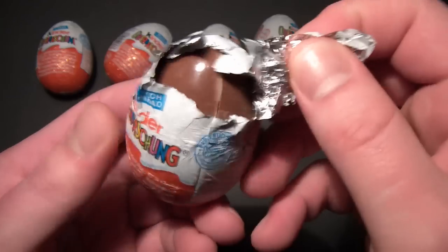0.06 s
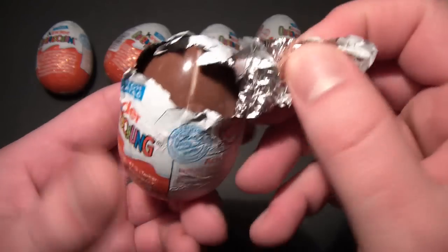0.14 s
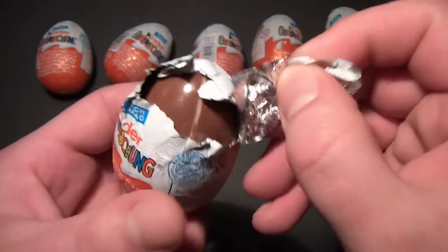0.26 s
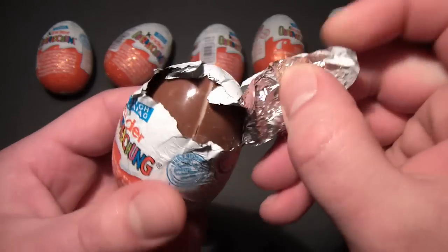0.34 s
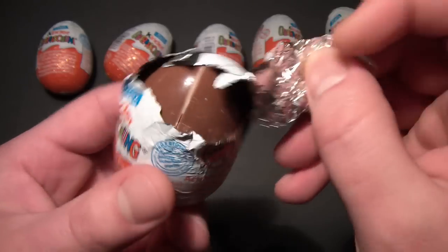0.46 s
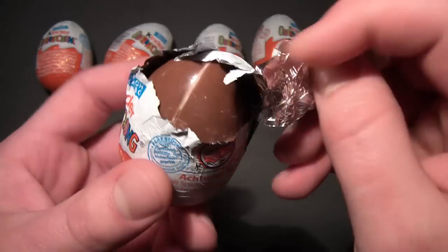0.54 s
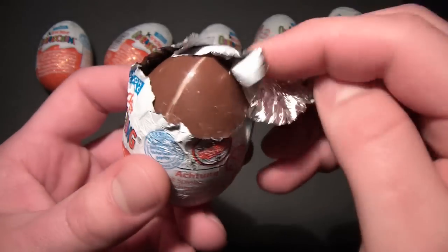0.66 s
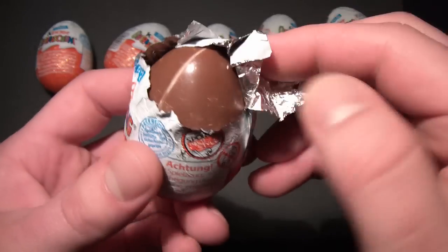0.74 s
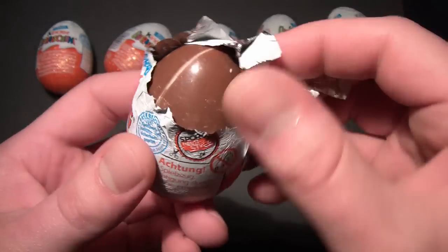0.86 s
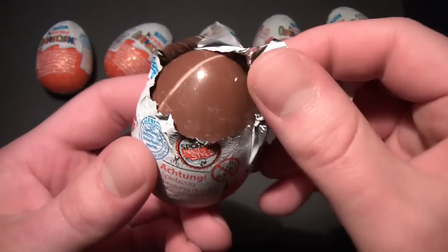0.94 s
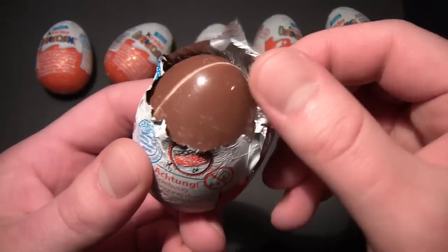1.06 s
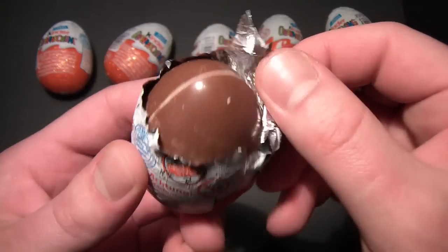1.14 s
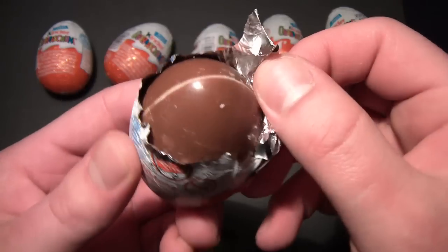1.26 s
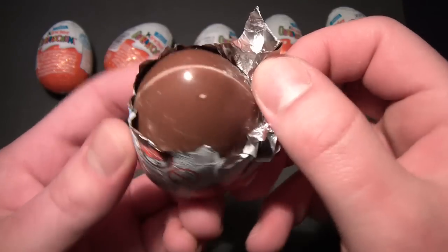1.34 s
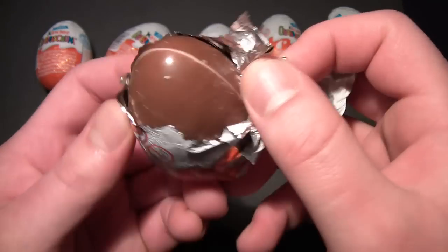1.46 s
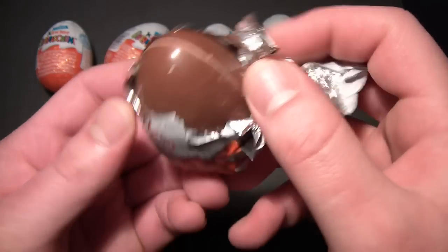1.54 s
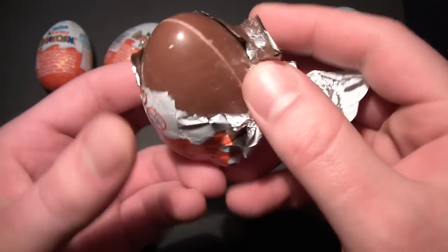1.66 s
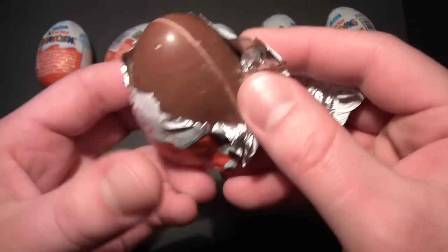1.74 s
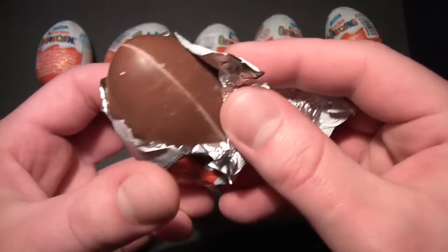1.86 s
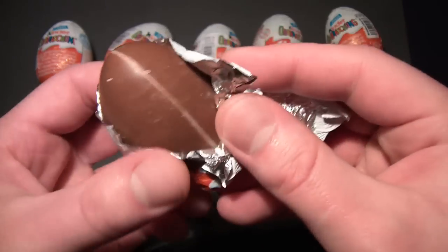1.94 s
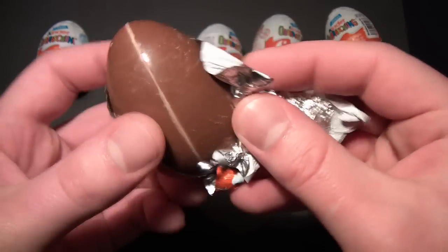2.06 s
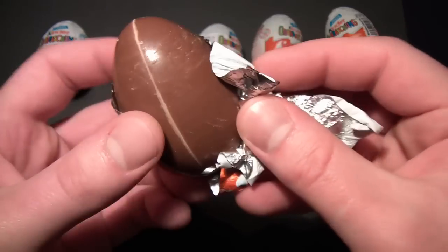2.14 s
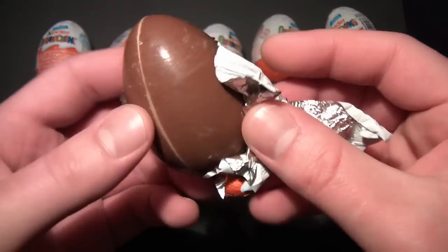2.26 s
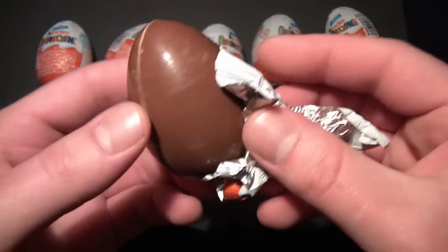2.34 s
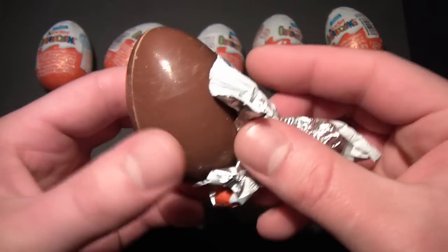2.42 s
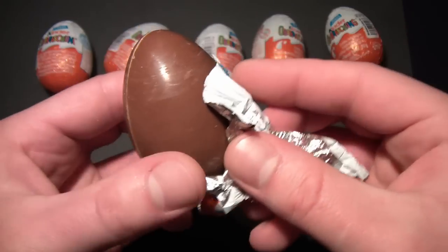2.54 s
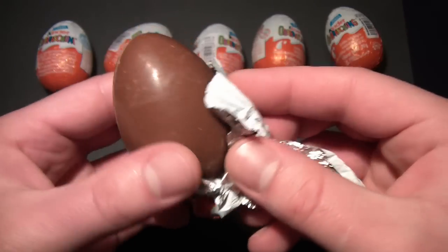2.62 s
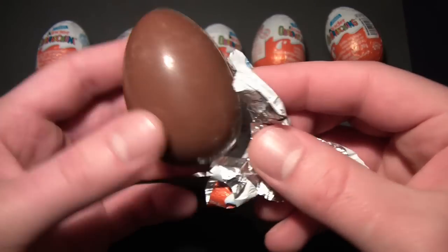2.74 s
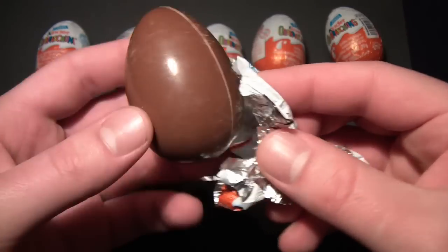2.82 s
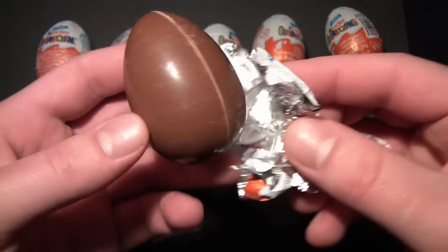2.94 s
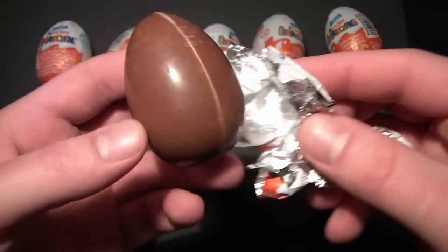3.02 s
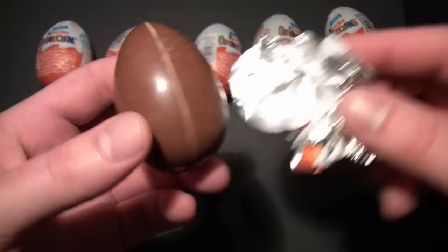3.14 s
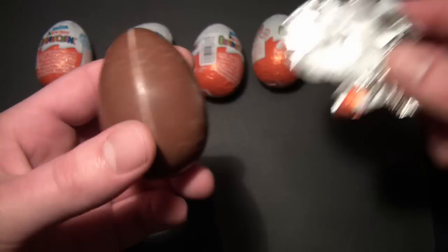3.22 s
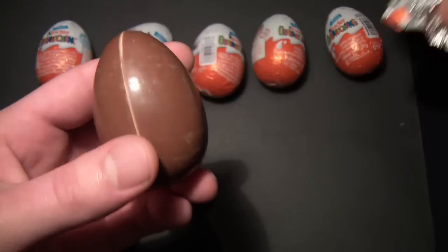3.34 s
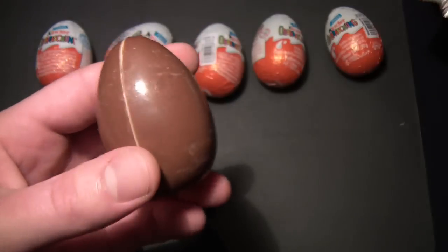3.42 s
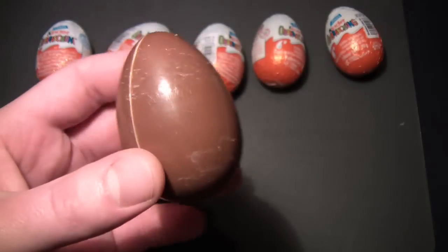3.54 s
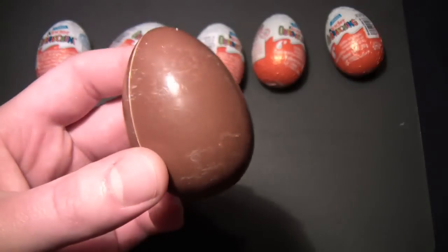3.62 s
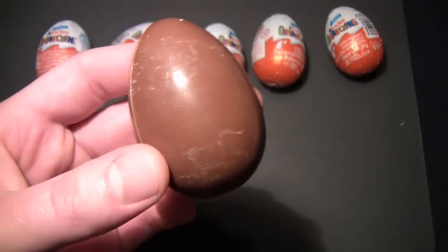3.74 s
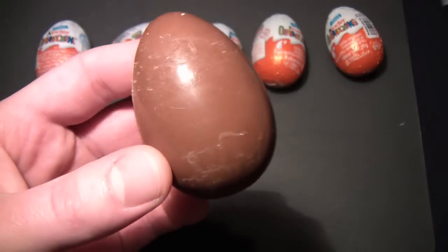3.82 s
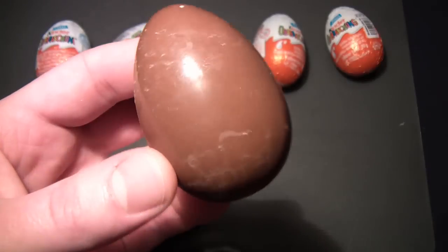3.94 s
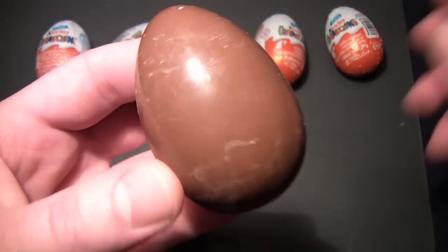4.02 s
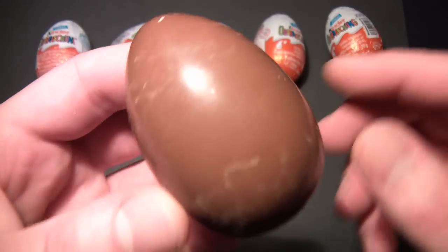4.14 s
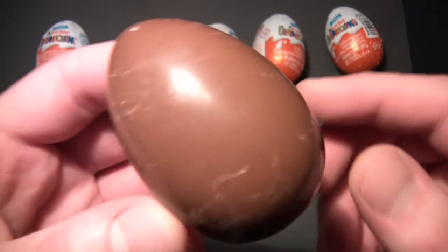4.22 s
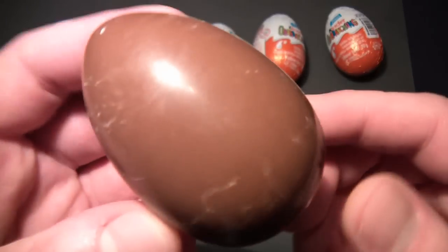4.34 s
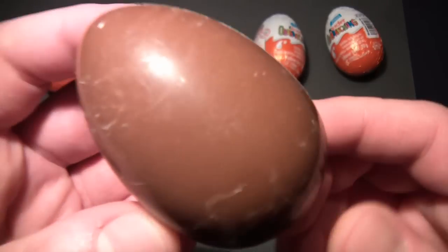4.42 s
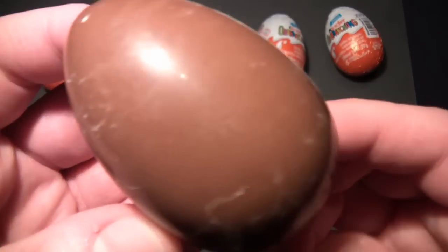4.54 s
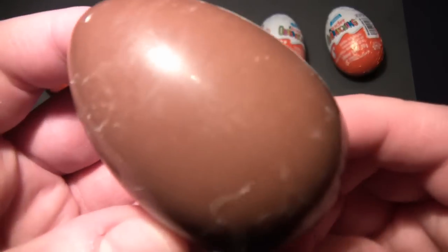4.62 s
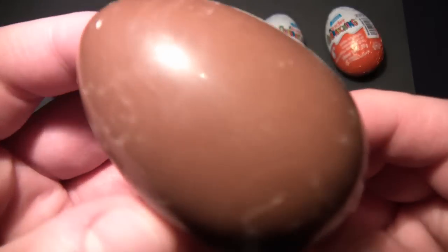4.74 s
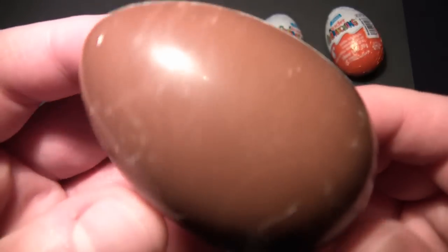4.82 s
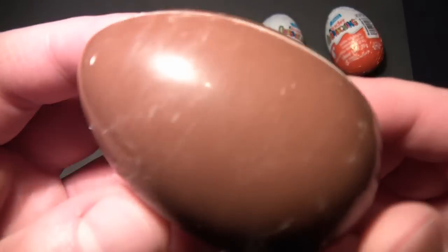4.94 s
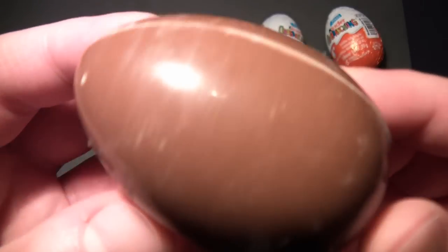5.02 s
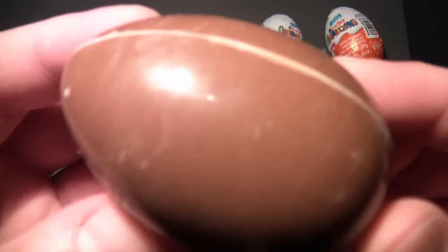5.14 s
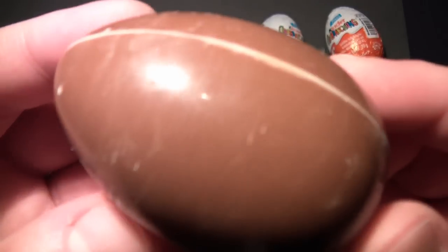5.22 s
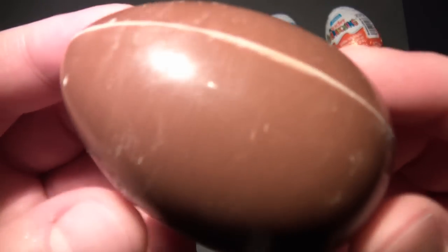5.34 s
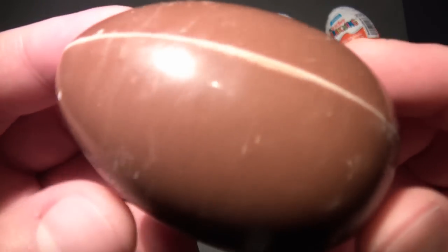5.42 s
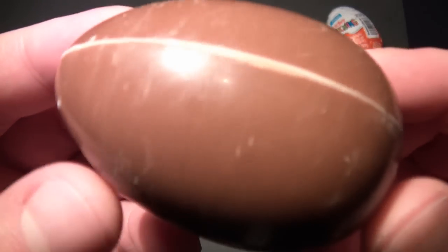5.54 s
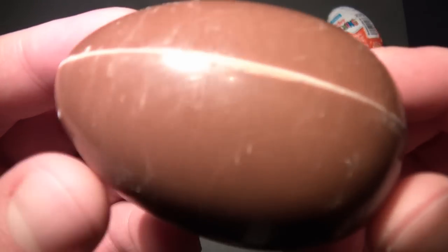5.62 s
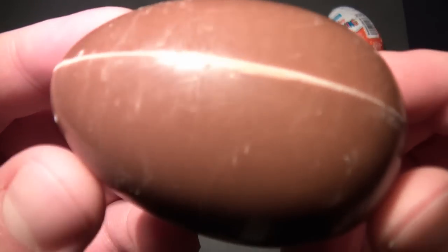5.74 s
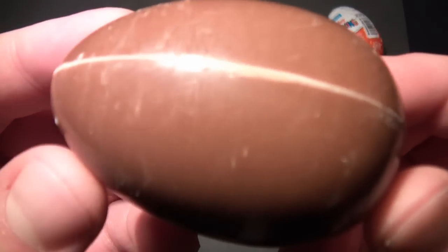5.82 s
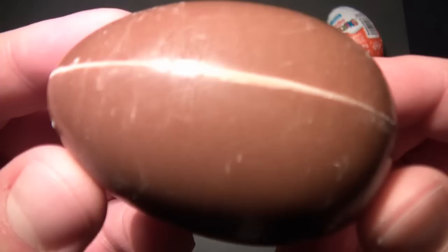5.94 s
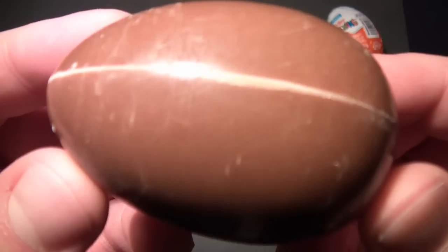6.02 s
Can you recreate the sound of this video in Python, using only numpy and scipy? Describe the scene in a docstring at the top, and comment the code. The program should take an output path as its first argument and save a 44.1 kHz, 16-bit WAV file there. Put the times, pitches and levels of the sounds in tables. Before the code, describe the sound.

Bright, crisp foil crinkles in short drags and sharp snaps for three seconds, ends in a loud crack, then small scraps of rustle fade into quiet room hiss.

```python
"""Thin metal foil is peeled off a hollow chocolate egg up close: creases buckle with sharp snaps, made of force
bursts ringing foil panels, over a rustle of tiny decaying sines and rubbing hiss that swells with each drag.
The crumpled foil is put down and pushed away. Soft noise puffs are fingertips bumping the egg, a decaying low
sine is the egg slipping free, and faint sine pings are something loose inside it.
Behind lie a short room tail, preamplifier hiss, room rumble and a few wavering tones."""
import sys
import numpy as np
from scipy import signal
from scipy.fft import rfft, irfft, next_fast_len
from scipy.io import wavfile
from scipy.ndimage import map_coordinates

SR = 44100
rng = np.random.default_rng(int(sys.argv[2]) if len(sys.argv) > 2 else 0)


def master_out(mix):
    """Clip the mix to full scale and print it as 16-bit PCM to the path in sys.argv[1]."""
    frames = np.transpose(np.atleast_2d(mix))
    ceiling = np.clip(frames, -1, 1)
    pcm = np.round(ceiling * 32767).astype(np.int16)
    wavfile.write(sys.argv[1], SR, pcm)


N = 267680

# Buckling creases. Each row: time in seconds, level in dB, panel pitch in Hz, treble share in dB.
CREASE_SNAPS = [(0.0417, -18.5, 3220, 11.5), (.063, -15.5, 8500, 4), (0.128, -22.5, 5680, 14),
                (0.1689, -7, 5700, 11.5), (0.2534, -17, 3000, 0), (0.259, -20.5, 2600, 1),
                (.338, -19.5, 2970, -10), (0.3494, 0.5, 8900, 16.5), (0.3605, -26, 5420, 8),
                (0.381, -27, 5770, 3), (0.4055, -13, 3427, 9), (0.441, -19, 6400, -5),
                (0.4973, -22.5, 5990, 2.5), (0.5109, -21, 5050, 7.5), (0.5355, -9, 8590, 23),
                (0.5527, -14, 5210, 27), (.574, -11, 3560, 16), (0.5828, -11.5, 5740, 7),
                (0.589, -10, 3430, -2), (0.6098, -15.5, 5600, 8.5), (0.638, -15.5, 4900, 14.5),
                (.7508, -4, 5170, 6), (0.766, -13, 8520, 10), (0.7832, -7.5, 5240, 37),
                (.818, -12.5, 6940, 16), (0.8725, -15.5, 6124, 5.5), (0.899, -9.5, 7350, 18),
                (0.9408, -21.5, 5300, 13), (0.9516, -5.5, 5220, 10), (0.9979, -5, 6500, 11),
                (1.0276, -15.5, 2800, 3), (1.099, -15, 5260, -3), (1.131, -9, 4200, -27),
                (1.1461, -3, 3573, -17.5), (1.1472, -7, 3740, -14), (1.163, -22.5, 5340, 3.5),
                (1.2022, -10, 3882, 3), (1.22, 0, 3240, -25), (1.2719, -12.5, 3260, -11.5),
                (1.286, -3.5, 3580, 4), (1.322, -14.5, 3370, 0), (1.347, -19, 3260, -4),
                (1.3839, -18, 3260, 5), (1.4318, -9.5, 6500, -21), (1.465, -12, 5060, 7),
                (1.4949, -11.5, 1840, 1), (1.54, -15, 2400, 4), (1.5486, -17.5, 4070, 5),
                (1.627, -16, 3920, 7), (1.6634, -8, 3380, -12), (1.722, -17.5, 8790, 9.5),
                (1.796, -21, 8170, 4.5), (1.8113, -13.5, 5455, 12), (1.8522, -9, 2380, 0),
                (1.8843, -13, 3200, -3), (1.8905, -12, 1330, -9.5), (1.9897, -6, 2110, -2.5),
                (2.0714, -14, 6334, 2), (2.1255, 0.5, 2480, 2), (2.1678, -2.5, 4220, 12.5),
                (2.1866, -4.5, 8100, 28), (2.199, -0.5, 5600, 2.5), (2.202, -5.5, 2577, 2.5),
                (2.2056, -8.5, 2515, -7), (2.2149, -9.5, 5240, -5.5), (2.292, -19, 6200, 10.5),
                (2.3066, -11, 5770, 11), (2.3131, -16.5, 4120, -7), (2.3212, -14, 3960, -3.5),
                (2.338, -17, 3450, -6), (2.3732, -7, 5770, -4), (2.3753, -1.5, 4200, 10),
                (2.3994, -18.5, 4100, -16), (2.466, -2, 4160, -6), (2.476, -12.5, 3380, 13.5),
                (2.5017, -18.5, 6030, 10.5), (2.5373, -16.5, 4100, 3), (2.5876, -14.5, 5095, 1),
                (2.6007, -17, 5850, 6), (2.654, -19, 4600, 2.5), (2.7344, -15.5, 5495, 3.5),
                (2.8348, -10, 5870, 6.5), (2.8551, -9, 6460, 5), (2.8836, -20, 3663, 1.5),
                (2.895, -12.5, 1156, -14.5), (2.9193, -21.5, 3000, -20), (2.989, -19.5, 3510, -9),
                (3.0107, -18, 2940, -11), (3.088, -11, 1526, -1.5), (3.1, 5, 3063, -9),
                (3.44, -14.5, 5940, -6), (3.5577, -23.5, 5300, -5), (3.7028, -32, 2940, 5.5),
                (4.0335, -10, 4730, -24), (4.09, -29.5, 8000, 6.5), (4.104, -19, 2900, -7),
                (4.205, -26.5, 3400, -7.5), (4.6319, -21, 4470, -18.5), (4.6385, -25.5, 2540, -13),
                (4.692, -19, 8260, 4.5), (4.75, -30, 4160, -10.5)]
# Drags of a finger or a fold across the foil. Each row: start and end in seconds, level in dB, panel pitch in Hz.
FOIL_DRAGS = [(0.237, 0.278, -41.5, 2800), (0.369, 0.381, -36, 5340), (0.408, 0.468, -35, 4640),
              (0.497, 0.562, -29.5, 5600), (0.574, 0.607, -33, 3200), (0.598, 0.639, -40, 5660),
              (0.758, 0.821, -38.5, 5580), (0.831, 0.851, -34.5, 5820), (.939, 0.963, -33, 5220),
              (0.987, 1.027, -39, 3190), (1.055, 1.075, -36.5, 2220), (1.117, 1.137, -31.5, 4130),
              (1.154, 1.154, -31.5, 3570), (1.19, 1.257, -29.5, 4300), (1.266, 1.308, -28.5, 2900),
              (1.437, 1.477, -31.5, 3290), (1.48, 1.51, -31, 1900), (1.656, 1.662, -22.5, 3640),
              (1.8, 1.828, -35, 5540), (1.835, 1.863, -28, 4400), (1.883, 1.904, -35.5, 5020),
              (1.989, 2.01, -41, 3500), (2.055, 2.084, -40, 3540), (2.112, 2.131, -36, 3760),
              (2.123, 2.194, -21.5, 3112), (2.206, 2.214, -28.5, 3540), (2.279, 2.363, -41.5, 3240),
              (2.357, 2.431, -40, 2440), (2.45, 2.509, -36.5, 3100), (2.705, 2.789, -38, 3570),
              (2.804, 2.89, -33, 3233), (2.91, 2.932, -31.5, 3490), (2.939, 2.948, -31, 3300),
              (2.96, 2.963, -25.5, 2483), (3.002, 3.01, -29, 2870), (3.031, 3.098, -39.5, 2560),
              (3.108, 3.118, -26, 2700), (3.14, 3.17, -53, 3083), (3.273, 3.297, -53, 2290),
              (3.369, 3.47, -41, 2040), (3.512, 3.575, -53.5, 2140), (3.662, 3.67, -37, 6690),
              (3.775, 3.83, -46.5, 3350), (3.84, 3.858, -42, 3600), (4.034, 4.041, -31.5, 3534),
              (4.099, 4.109, -34.5, 1490), (4.209, 4.238, -46, 1157), (4.598, 4.634, -50.5, 1133),
              (4.649, 4.66, -39, 2690), (4.704, 4.711, -36, 5430)]
# Murmur of the held foil between movements. Each row: time in seconds, level in dB.
HELD_MURMUR = [(0, -37), (.04, -48.5), (.3, -56), (.4, -47.5), (.66, -47.5), (1.5, -41.5), (1.6, -47),
               (2.68, -46.5), (3.119, -40.5), (3.24, -63.5), (3.5, -59), (3.6, -57.5), (3.72, -49.5),
               (3.9, -62), (4.15, -60.5), (4.4, -74), (4.6, -73.5), (4.645, -47.5), (4.861, -73.5)]
# Bass share of the foil, higher while it drags on the hollow egg or the table. Each row: time in seconds, share in dB.
BASS_SHARE = [(0, 1.5), (.38, -12), (.55, 5), (.75, 0.5), (.95, -1), (1.05, 4.5), (1.13, 7), (1.44, -28.5),
              (1.5, -9), (1.66, -17.5), (1.9, 6), (2.35, -4.5), (2.47, 3.5), (2.85, 5), (2.94, -1.5),
              (3.1, 3.5), (4.04, -4), (4.2, 6.5), (4.7, -1)]
# Spectrum of the foil's crackle. Each row: frequency in Hz, relative density in dB per Hz.
FOIL_SPECTRUM = [(88, -43), (450, -19.5), (600, -17), (1760, -16), (3350, -11.5), (3920, -13),
                 (11500, -19.5), (14800, -22)]
# The hollow egg and the foil taut over it ring along. Each row: centre in Hz, width in Hz, strength in dB.
SHELL_MODES = [(632.3, 56, -1.5), (1093, 98, -9.5), (5310, 130, 0)]
# Hollows of the open foil cup. Each row: centre in Hz, width in Hz, strength in dB.
CUP_MODES = [(1522, 300, 3), (2540, 450, 8), (3350, 750, 7)]
# Hollows of the crumpled foil. Each row: centre in Hz, width in Hz, strength in dB.
BALL_MODES = [(1530, 52, 6), (2317, 240, -1)]
# Stereo width of the foil. Each row: frequency in Hz, gain on its side signal in dB.
FOIL_WIDTH = [(60, -8), (180, -17), (550, -21), (1200, -25), (2200, -21), (4500, -15), (8000, -11),
              (15000, -10)]
# Fingertips bump the egg. Each row: time in seconds, peak in dB.
EGG_KNOCKS = [(1.023, -32), (1.474, -39.5), (1.71, -40), (1.897, -32.5), (2.207, -32), (3.102, -29)]
# A loose part taps the shell. Each row: time in seconds, level in dB before the soft onset, pitch in Hz.
SHELL_PINGS = [(5.052, -50.5, 1148), (5.794, -51.5, 1136)]
# Decay of the room. Each row: frequency in Hz, t60 in seconds.
ROOM_DECAY = [(300, 0.68), (2000, 0.29), (10000, 0.16)]
# Spectrum of room and preamplifier. Each row: frequency in Hz, relative density in dB per Hz.
FLOOR_SPECTRUM = [(20, -12), (70, -10.5), (110, -8), (160, -10), (200, -6), (300, -14), (800, -17),
                  (1600, -19), (2000, -22), (13500, -22), (14200, -45)]
# Likeness of the floor at the two ports. Each row: frequency in Hz, left-right correlation.
FLOOR_LIKENESS = [(60, 1), (200, 0.85), (700, 0.24), (15000, .05)]
# Steady background tones. Each row: pitch in Hz, rms level in dB before wavering.
HUM_TONES = [(199.5, -79), (9001, -85), (12209, -86)]

LOOSE_S = 2.905  # the last fold lets go and the foil hangs as an open cup
AWAY_S = 3.15  # the foil leaves the egg and is carried away
ASIDE_S = 3.92  # the foil now lies to the right
# snaps are thinner than drags, and differ
SNAP_BASS_DB, BASS_SCATTER_DB = -3, 1.5
# in drags, small tight panels ring high, hiss brightly and lose bass
DRAG_TREBLE_DB, TREBLE_DB_PER_OCTAVE, THIN_DB_PER_OCTAVE, MIDDLE_HZ = 0.5, 8.5, 3.5, 3300
# a drag swells in the slower the longer it lasts, loose foil slower still
RISE_S, RISE_SHARE, LOOSE_RISE_SHARE = 0.001134, 0.097, 0.15
LEFT_LAG_S = 0.000014  # the foil lying aside reaches the left port this late
GLANCE_S = 0.00086  # scale of the random delay of echoes off the hands
TOP_HZ = 16300  # band limit


def snaps(rise=0.00041, burst_t60=0.0079, flip_db=14.0, size=1024):
    """A crease creeps, then flips: a short burst of force rings the panel beside it."""
    s, level_db, pitch, treble_db = np.transpose(CREASE_SNAPS)[..., None]
    t, hz = (np.arange(size) - 64) / SR, np.fft.rfftfreq(2 * size, 1 / SR)
    chance = rng.standard_normal((len(s), size + 5))
    loose = s > AWAY_S
    life = burst_t60 * amp(3.03 * chance[:, :1] + 7.9 * loose)  # loose foil shakes longer
    envelope = np.where(t < 0, np.exp(-np.abs(t) / rise), amp(-60 * t / life))
    force = chance[:, 5:] * envelope
    force[:, 64] = amp(flip_db) * np.sign(force[:, 64])  # the flip itself
    # thin foil radiates no deep bass, and fades at the very top
    radiation = hz ** 4 / (hz ** 4 + 500 ** 4) / (1 + (hz / 15000) ** 12)
    # two smaller panels nearby
    others = sum(panel(hz, 6000 * amp(4.006 * chance[:, k:k + 1]), 23) for k in (3, 4))
    bass_db = np.interp(s, *np.transpose(BASS_SHARE)) + SNAP_BASS_DB + BASS_SCATTER_DB * chance[:, 2:3]
    colour = voiced(hz, pitch, bass_db, treble_db, ring_db=14.5 - 3.7 * loose,
                    sharpness=10 * np.sqrt(pitch / MIDDLE_HZ))
    colour = radiation * (1 + amp(5.0) * others) * colour
    rows = irfft(rfft(force, 2 * size) * colour)[:, :size]
    rows = amp(level_db) * rows / np.abs(rows).max(axis=1, keepdims=True)
    return place(s[:, 0] + t[0], rows, chance[:, 1:2])


def rustle(fall=0.0065, size=8192):
    """The crackle swells in each drag with that drag's colour, and murmurs on while the foil is held."""
    tight = crackle(hiss_db=-5, clump_db=3, tick_db=0)
    loose = crackle(hiss_db=2, clump_db=2, tick_db=-5)  # loose foil slides more than it buckles
    bed = np.where(np.arange(N) < LOOSE_S * SR, tight, loose)
    bed = np.pad(bed, ((0, 0), (size // 4, size)))
    out = np.zeros_like(bed)
    t, hz = (np.arange(size) - size // 4) / SR, np.fft.rfftfreq(size, 1 / SR)
    for start, end, db, pitch in FOIL_DRAGS:
        octaves = np.log2(pitch / MIDDLE_HZ)
        bass_db = np.interp((start + end) / 2, *np.transpose(BASS_SHARE)) - THIN_DB_PER_OCTAVE * octaves
        treble_db = DRAG_TREBLE_DB + TREBLE_DB_PER_OCTAVE * octaves
        colour = voiced(hz, pitch, bass_db, treble_db, ring_db=-0.5 + 5.9 * (start > AWAY_S), sharpness=7)
        at = round(start * SR)
        piece = irfft(rfft(bed[:, at:][:, :size]) * colour, size)
        rise = RISE_S + (LOOSE_RISE_SHARE if start > AWAY_S else RISE_SHARE) * (end - start)
        # swell up to the start, hold, and die away after the end
        swell = np.exp(np.minimum(t / rise, 0) - np.maximum((t - end + start) / fall, 0))
        out[:, at:][:, :size] += amp(db) * swell * piece
    held = filtered(crackle(hiss_db=8.5, clump_db=3.0, tick_db=5.0),
                    lambda hz: voiced(hz, 3900, 1.5, 5.0, ring_db=-7.0, sharpness=0.89))
    s, held_db = np.transpose(HELD_MURMUR)
    murmur = amp(np.interp(np.arange(N) / SR, s, held_db, right=-120)) * unit(held)
    return out[:, size // 4:][:, :N] + murmur


def crackle(hiss_db, clump_db, tick_db, spread_db=1.5, top_db=16, cycles=1.2, ring_db=17, count=14000, size=160):
    """Countless tiny buckles in clumps, each a few cycles at its own pitch, over the hiss of rubbing; rms 1."""
    t = np.arange(size) / SR
    u, lean = rng.random((count, 4)), rng.standard_normal((count, 1))
    pitch = 500 * 30 ** u[:, 1:2]
    life = cycles * amp(ring_db * u[:, 3:])  # in cycles: some click, some ring
    size_db = np.minimum(-spread_db * np.log(u[:, 2:3]), top_db)
    envelope = np.exp(-t * pitch / life) / np.sqrt(life) * np.hanning(2 * size)[size:]
    grains = amp(size_db) * np.sin(2 * np.pi * pitch * t) * envelope
    bed = place(u[:, 0] * N / SR, grains, lean)
    # pitches are even per octave: lift to even per Hz
    bed = unit(filtered(bed, lambda hz: np.clip(hz, 500, 15000)))
    bed = bed + amp(hiss_db) * rng.standard_normal((2, N)) + amp(tick_db) * unit(ticks())
    bed = bed * amp(clump_db * (wobble(70) + wobble(200)))
    return unit(filtered(bed, lambda hz: amp(along(FOIL_SPECTRUM, hz))))


def ticks(count=1200, size=256):
    """Sparse small creases: bursts of about a millisecond, each coloured by its own panel."""
    u, g = rng.random((count, 3)), rng.standard_normal((count, size + 1))
    colour = 1 + amp(12) * panel(np.fft.rfftfreq(size, 1 / SR), 1500 * 8 ** u[:, 2:], 13)
    rows = irfft(rfft(g[:, 1:] * np.exp(-np.arange(size) / 25)) * colour)
    return place(u[:, 0] * N / SR, amp(6 * u[:, 1:2]) * rows, g[:, :1])


def voiced(hz, pitch, bass_db, treble_db, ring_db, sharpness):
    """Colour of one movement: bass and treble shares, and the foil panel that rings below the treble."""
    bass, middle, treble = shares(hz)
    ring = 1 + amp(ring_db) * panel(hz, pitch, sharpness)
    return (amp(bass_db) * bass + middle) * ring + amp(treble_db) * treble


def shares(hz):
    """Smooth weights of bass, middle and treble that add up to one."""
    bass = 1 / (1 + (hz / 1400) ** 6)
    treble = 1 - 1 / (1 + (hz / 7500) ** 6)
    return bass, 1 - bass - treble, treble


def panel(hz, pitch, sharpness):
    """One damped resonance of a foil panel, gain 1 at its pitch."""
    damping = 1j * hz * pitch / sharpness
    return damping / (pitch ** 2 - hz ** 2 + damping)


def hollows(x, modes, plain_db):
    """The sound x with hollow shapes ringing along as damped resonances; plain_db scales the whole."""
    def response(hz):
        ring = sum(amp(db) * 1j * hz * w / (c * c - hz * hz + 1j * hz * w) for c, w, db in modes)
        return amp(plain_db) * (1 + ring)
    return filtered(x, response)


def thump(db=-43, t60=0.059):
    """The egg slips free and a low push of air reaches the ports: a decaying 60 Hz sine."""
    t = np.clip(np.arange(N) / SR - 3.098, 0, None)
    return amp(db - 60 * t / t60) * np.sin(2 * np.pi * 60 * t)


def knocks(t60=.04, pitch_hz=380, size=4096):
    """Fingertips bump the egg: soft dull puffs of low noise."""
    s, peak_db = np.transpose(EGG_KNOCKS)[..., None]
    t, hz = np.arange(size) / SR, np.fft.rfftfreq(size, 1 / SR)
    puff = rng.standard_normal((len(s), size)) * amp(-60 * t / t60) * (1 - np.exp(-t / 0.006))
    rows = irfft(rfft(puff) * panel(hz, pitch_hz, .5) ** 2)
    rows = amp(peak_db) * rows / np.abs(rows).max(axis=1, keepdims=True)
    return place(s[:, 0], rows, 0 * s)[0]


def pings(t60=0.061):
    """A loose part taps the hollow shell, which rings on one note."""
    s, level_db, hz = np.transpose(SHELL_PINGS)[..., None]
    t = np.arange(SR // 10) / SR
    onset = 1 - np.exp(-t / 0.0018)
    rows = amp(level_db - 60 * t / t60) * np.sin(2 * np.pi * hz * t) * onset
    return place(s[:, 0], rows, 0 * s)[0]


def room(x, count=12):
    """Each frequency dies at its own speed; the hands move, so every half second has its own tail."""
    out = np.zeros((2, N + SR))
    step = -(-N // count)
    for k in range(count):
        hz, t, z = signal.stft(rng.standard_normal((2, SR // 3)), SR, nperseg=256)
        decay = amp(-60 * t / along(ROOM_DECAY, hz)[:, None])
        tail = signal.istft(z * decay, SR, nperseg=256)[1]
        tail = tail / np.linalg.norm(tail[0])
        wet = signal.fftconvolve(x[None, k * step:(k + 1) * step], tail, axes=1)
        out[:, k * step + 150:][:, :wet.shape[1]] += wet  # pre-delay of 150 samples
    return out[:, :N]


def floor(level_db=-61.5):
    """Hiss that differs between the ports, room rumble that both share, and a few wavering tones."""
    def spread(hz):
        turn = np.arccos(np.clip(along(FLOOR_LIKENESS, hz), -1, 1)) / 2
        return amp(along(FLOOR_SPECTRUM, hz)) * [np.cos(turn), np.sin(turn)]
    mid, side = filtered(rng.standard_normal((2, N)), spread)
    t = np.arange(N) / SR
    tones = sum(np.sqrt(2) * amp(db + 3 * wobble(15)) * np.sin(2 * np.pi * hz * t + wobble(12))
                for hz, db in HUM_TONES)
    return amp(level_db) * unit(np.array([mid + side, mid - side])) + tones


def place(times, rows, lean):
    """Sums rows at their times: mid, and side as an echo off the hands with each row's own sign and delay."""
    at = np.round(times * SR).astype(int)[:, None] + np.arange(rows.shape[1])
    late = at + 1 + (np.abs(lean) * GLANCE_S * SR).astype(int)
    mid = np.bincount(at.ravel(), rows.ravel(), N)[:N]
    side = np.bincount(late.ravel(), (rows * np.sign(lean)).ravel(), N)[:N]
    return np.array([mid, side])


def amp(db):
    """Decibels as an amplitude factor."""
    return 10 ** (np.asarray(db) / 20)


def unit(x):
    """Scaled to rms 1."""
    return x / np.sqrt(np.mean(x ** 2) + 1e-20)


def along(points, hz):
    """Reads a curve of (Hz, value) points on a log frequency axis."""
    f, v = np.transpose(points)
    return np.interp(np.log(hz + 1), np.log(f + 1), v)


def filtered(x, response):
    """The spectrum of x times a response of frequency."""
    m = next_fast_len(N + SR // 2)
    return irfft(rfft(x, m) * response(np.fft.rfftfreq(m, 1 / SR)), m)[..., :N]


def wobble(rate):
    """A smooth random curve, rate knots a second."""
    knots = rng.standard_normal(int(N * rate / SR) + 4)
    return map_coordinates(knots, [np.arange(N) * rate / SR])


def scene():
    """Foil close in front of both ports, a little room, the floor; the foil's width is mostly in the treble."""
    foil, t = snaps() + rustle(), np.arange(N) / SR
    tight, away = t < LOOSE_S, t >= AWAY_S
    on_egg = hollows(foil * tight, SHELL_MODES, plain_db=0)
    open_cup = hollows(foil * (~tight & ~away), CUP_MODES, plain_db=-4.0)
    crumpled = hollows(foil * away, BALL_MODES, plain_db=-1.5)
    foil = on_egg + open_cup + crumpled
    wet_db = np.where(away, -9, -22)  # farther off, the room weighs more
    mid, side = foil + room(amp(wet_db) * foil[0])
    side = filtered(side, lambda hz: amp(along(FOIL_WIDTH, hz)))
    # opposite phase turns at the two ports make the left one late
    aside = filtered(mid * (t > ASIDE_S), lambda hz: -1j * np.tan(np.pi * np.minimum(hz, TOP_HZ) * LEFT_LAG_S))
    stereo = np.array([mid + side + aside, mid - side - aside])
    return stereo + thump() + knocks() + pings() + floor()


def record(dry):
    """Peaks beyond full scale clip; then a steep low-pass lets nothing above the band limit through."""
    return filtered(np.clip(dry, -1, 1), lambda hz: 1 / (1 + (hz / 15200) ** 24) * (hz < TOP_HZ))


dry = scene()
out = record(dry)
master_out(out)
```